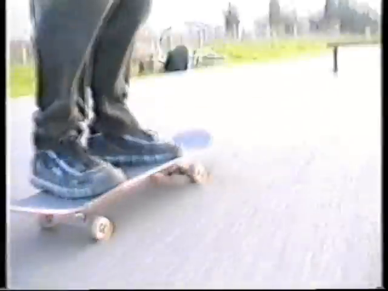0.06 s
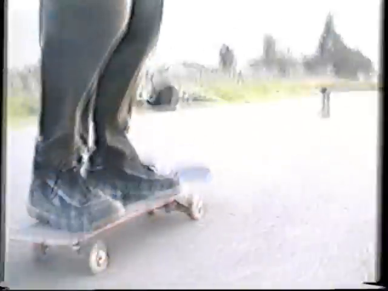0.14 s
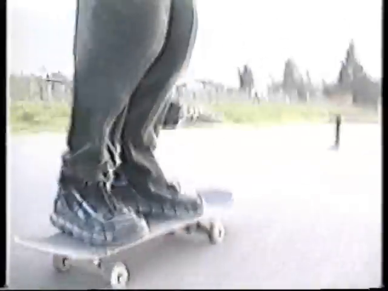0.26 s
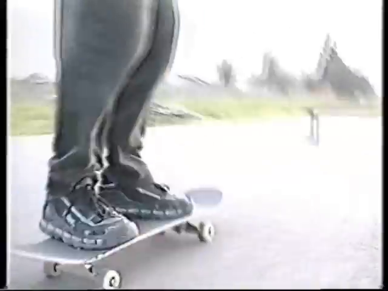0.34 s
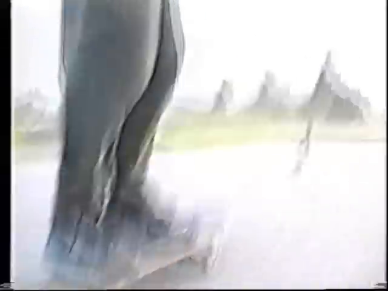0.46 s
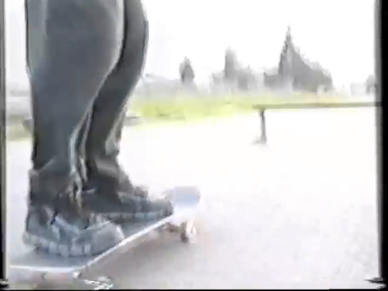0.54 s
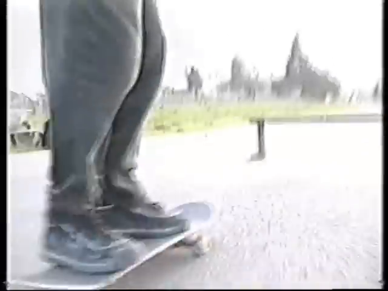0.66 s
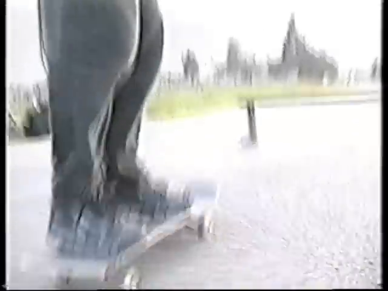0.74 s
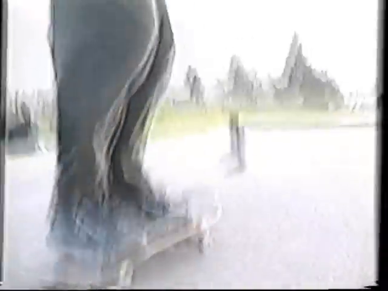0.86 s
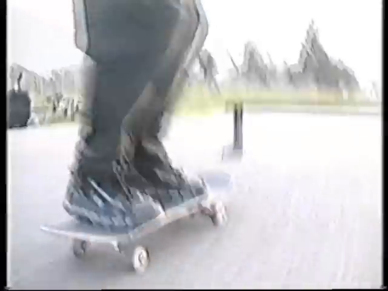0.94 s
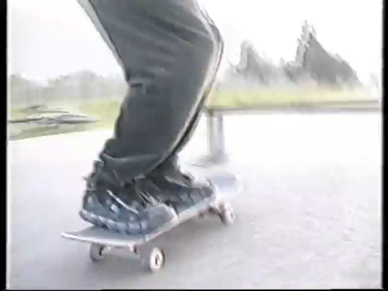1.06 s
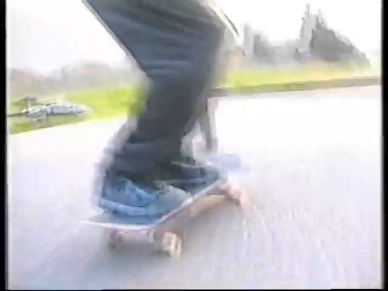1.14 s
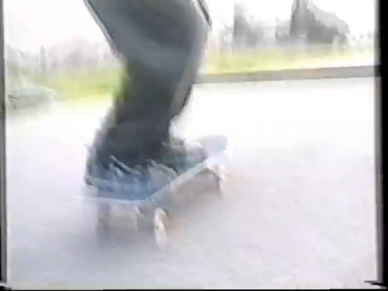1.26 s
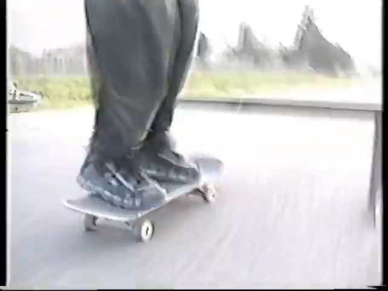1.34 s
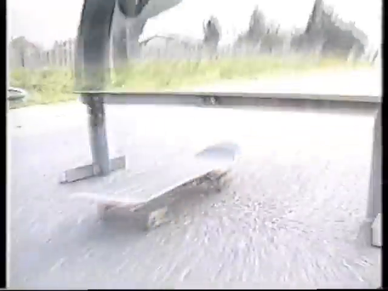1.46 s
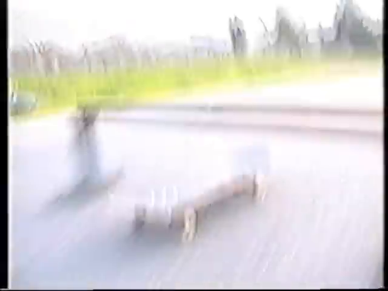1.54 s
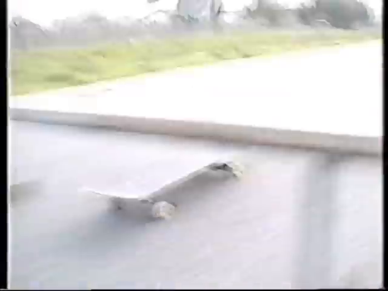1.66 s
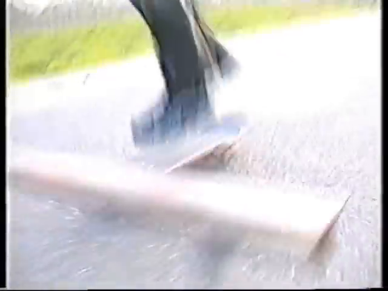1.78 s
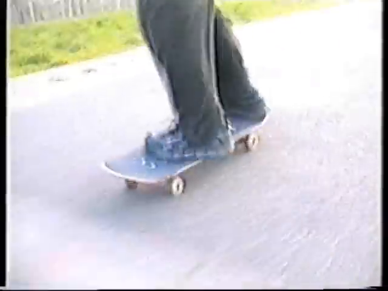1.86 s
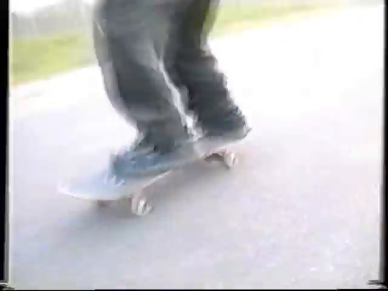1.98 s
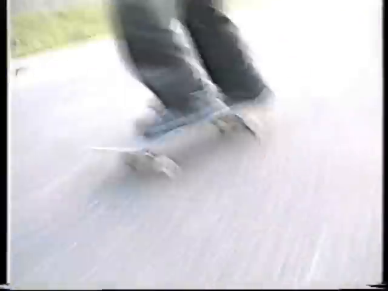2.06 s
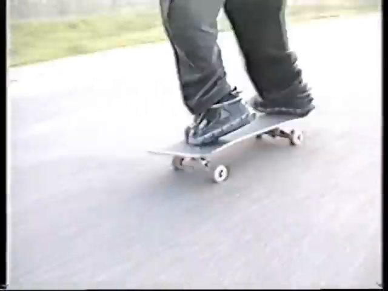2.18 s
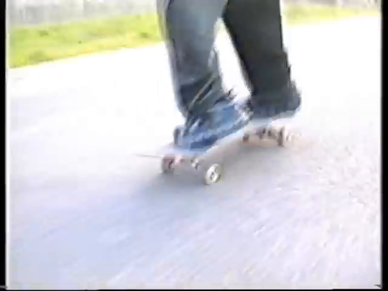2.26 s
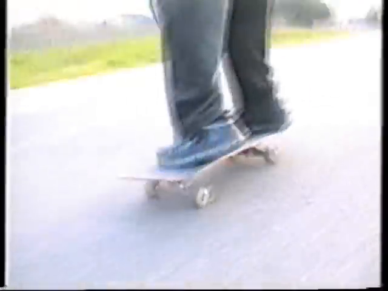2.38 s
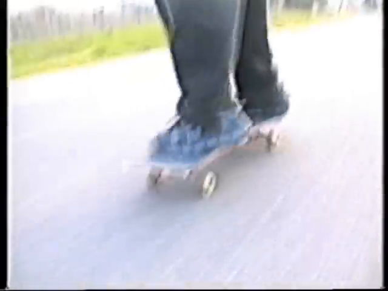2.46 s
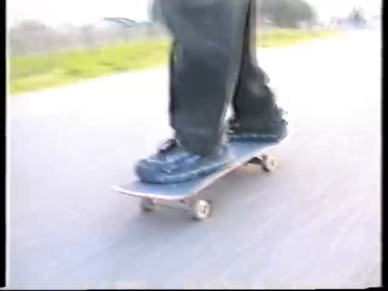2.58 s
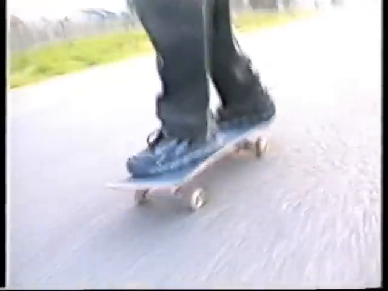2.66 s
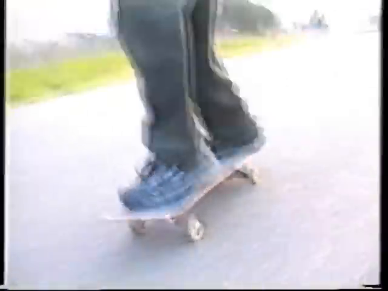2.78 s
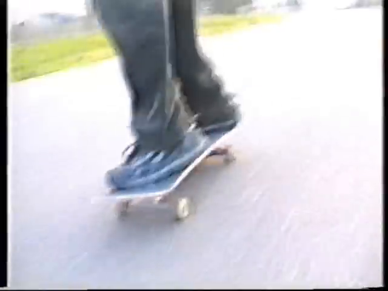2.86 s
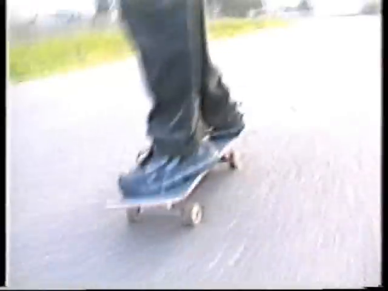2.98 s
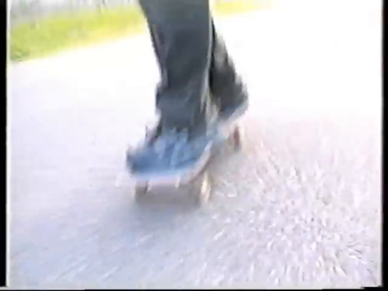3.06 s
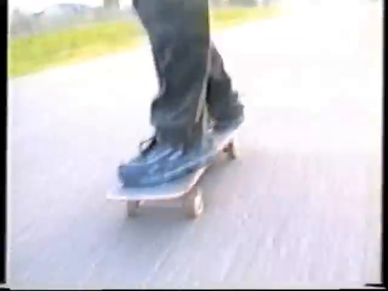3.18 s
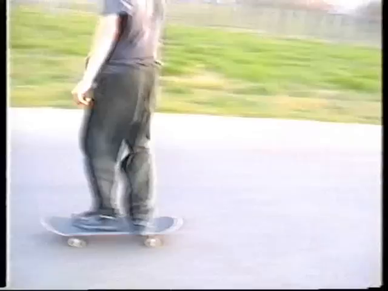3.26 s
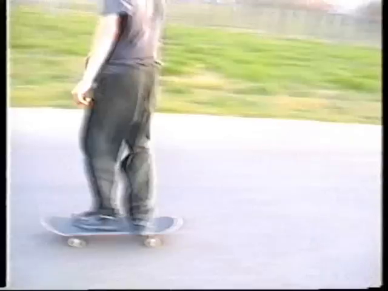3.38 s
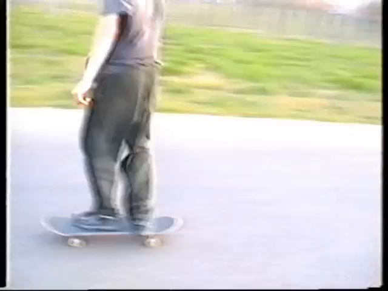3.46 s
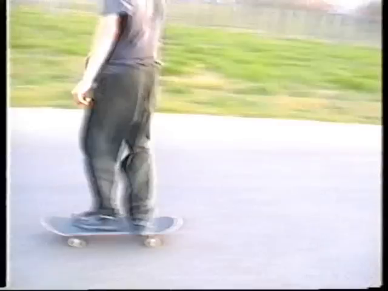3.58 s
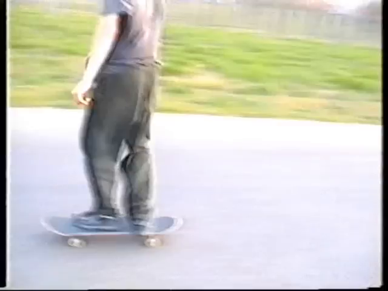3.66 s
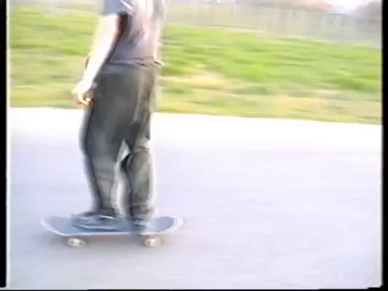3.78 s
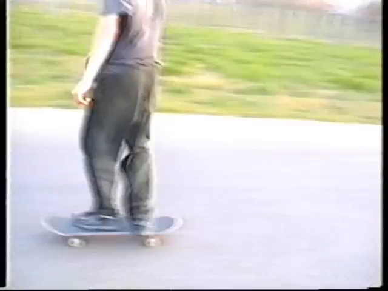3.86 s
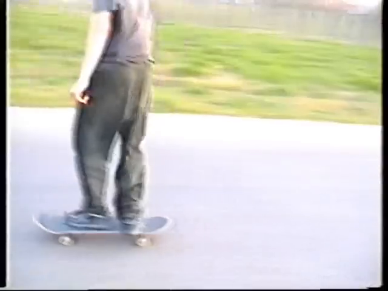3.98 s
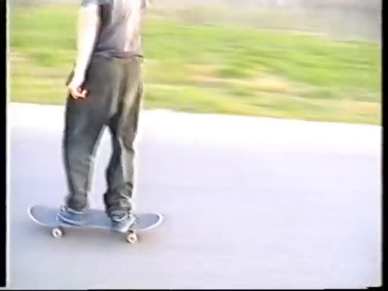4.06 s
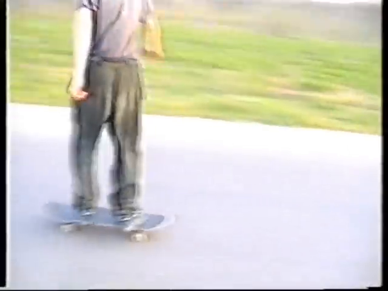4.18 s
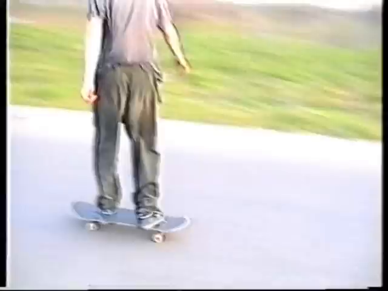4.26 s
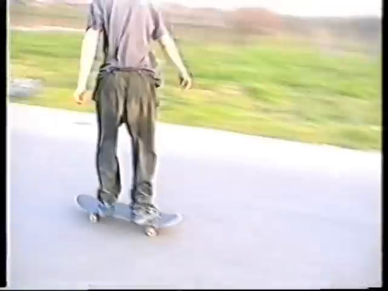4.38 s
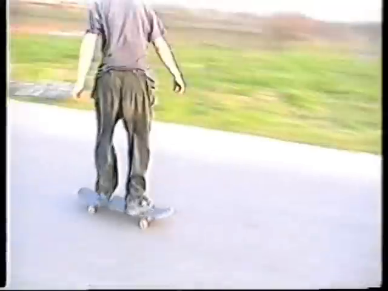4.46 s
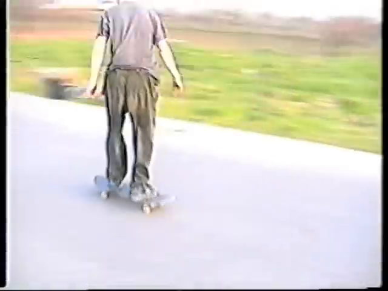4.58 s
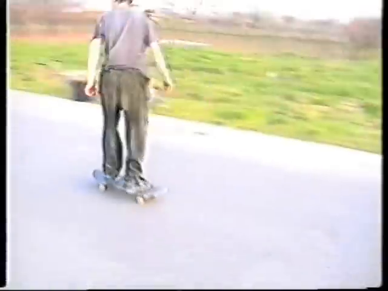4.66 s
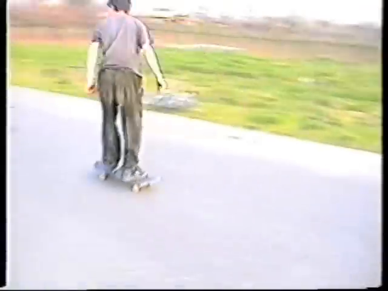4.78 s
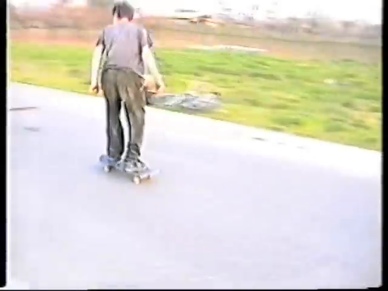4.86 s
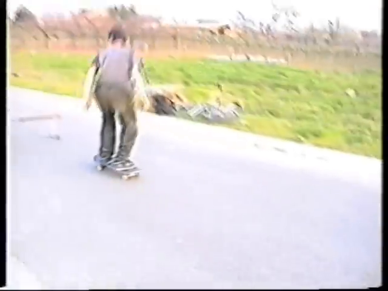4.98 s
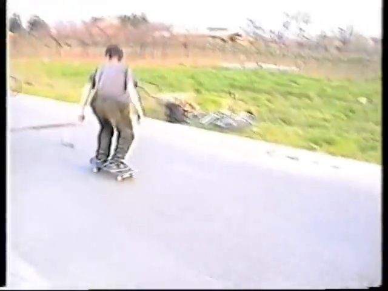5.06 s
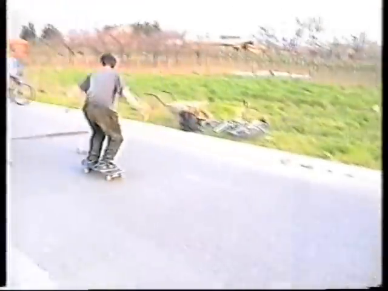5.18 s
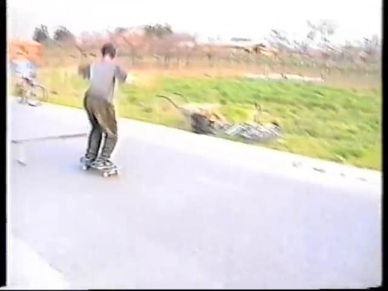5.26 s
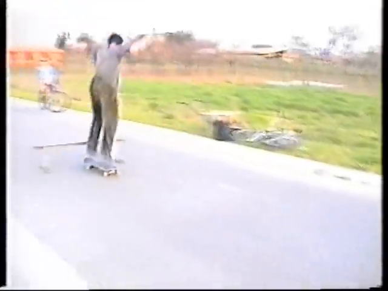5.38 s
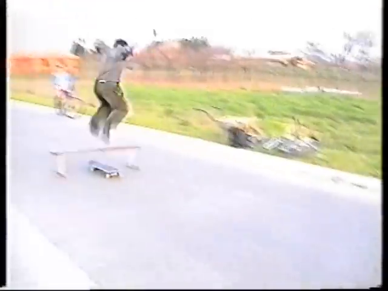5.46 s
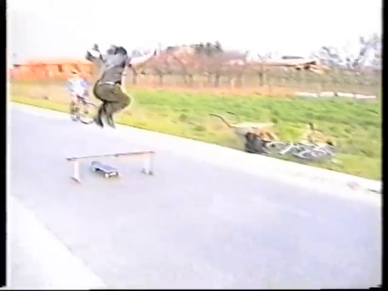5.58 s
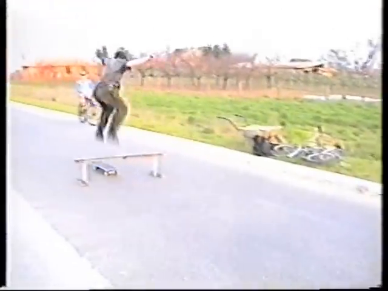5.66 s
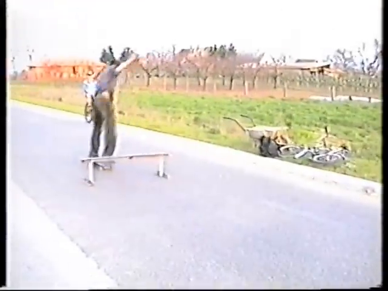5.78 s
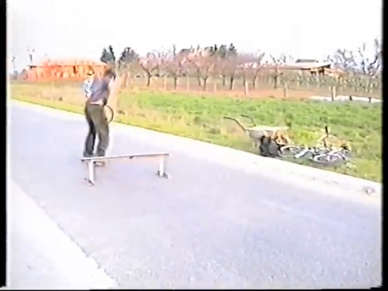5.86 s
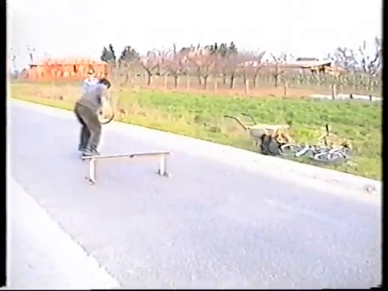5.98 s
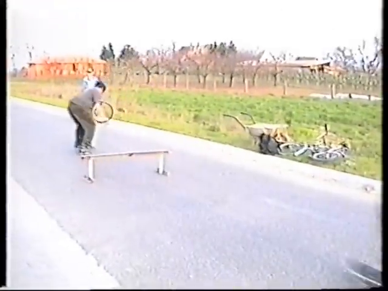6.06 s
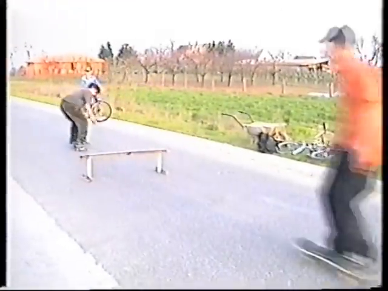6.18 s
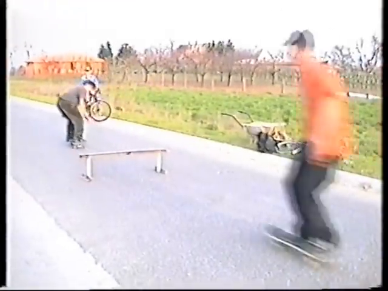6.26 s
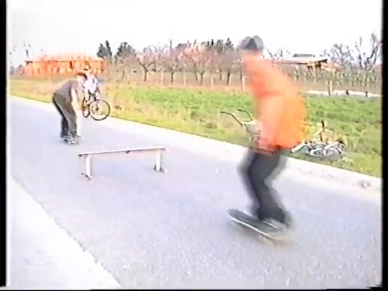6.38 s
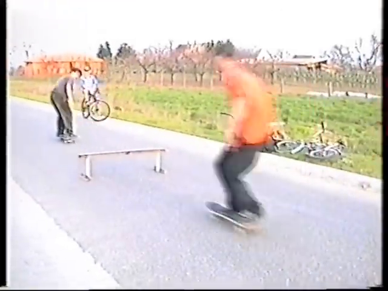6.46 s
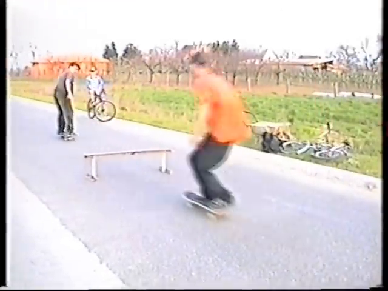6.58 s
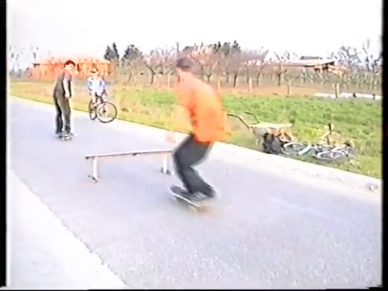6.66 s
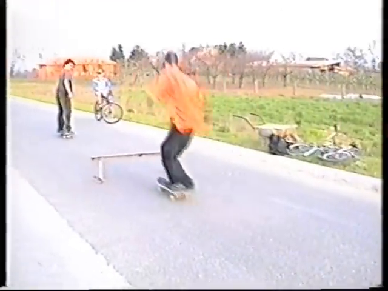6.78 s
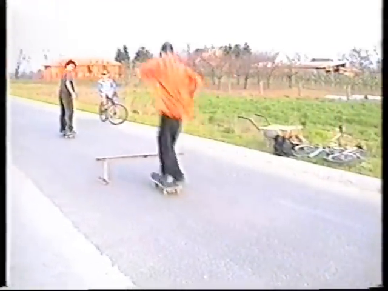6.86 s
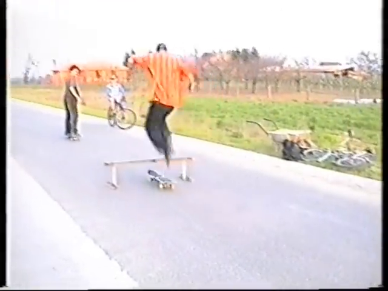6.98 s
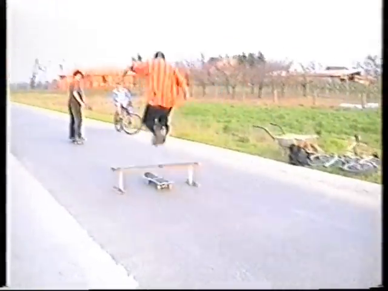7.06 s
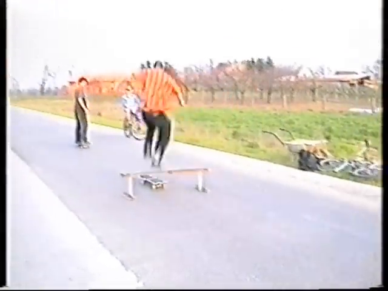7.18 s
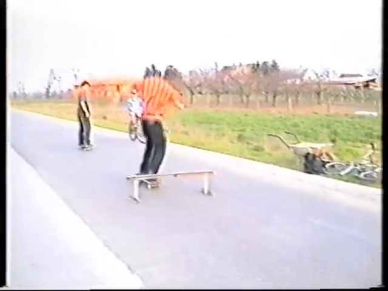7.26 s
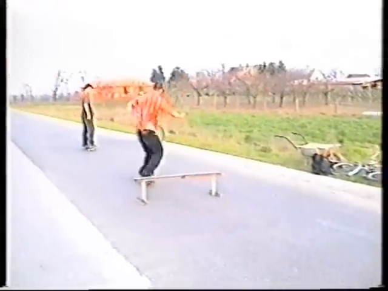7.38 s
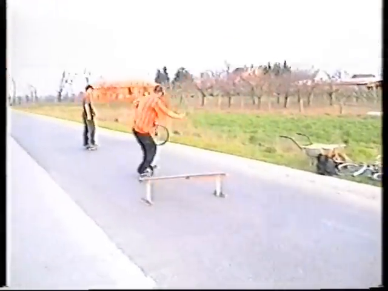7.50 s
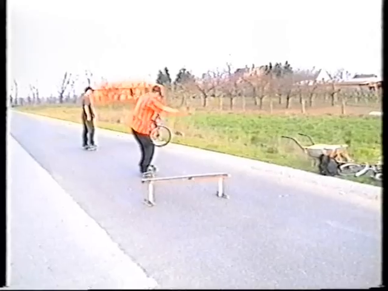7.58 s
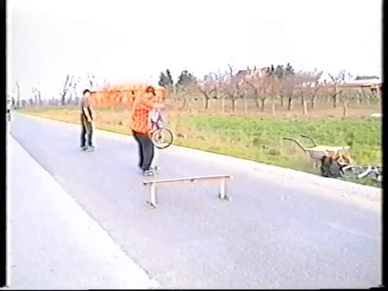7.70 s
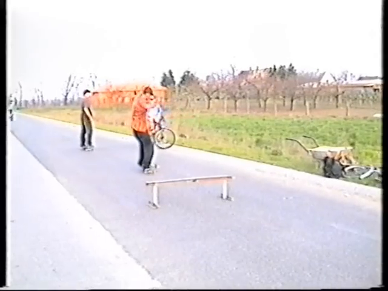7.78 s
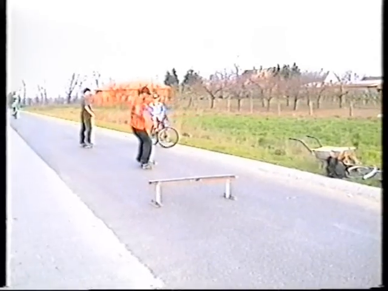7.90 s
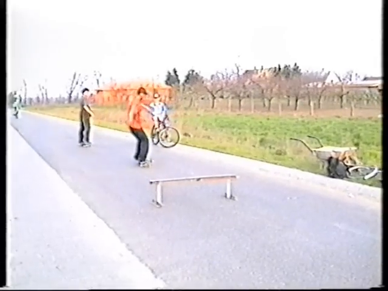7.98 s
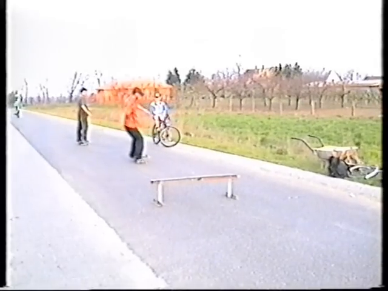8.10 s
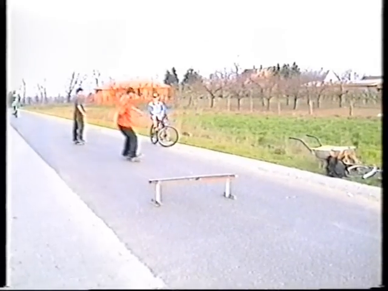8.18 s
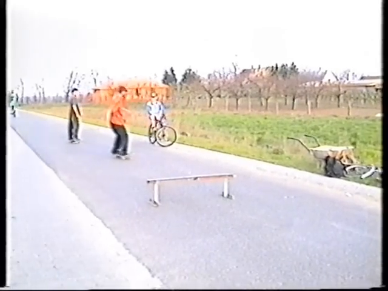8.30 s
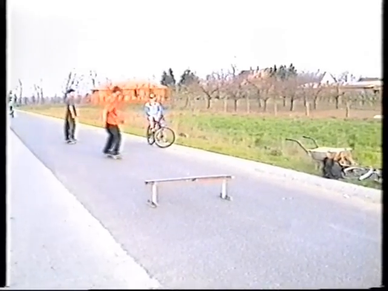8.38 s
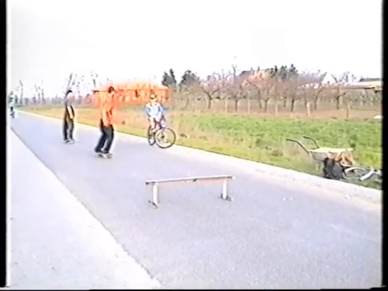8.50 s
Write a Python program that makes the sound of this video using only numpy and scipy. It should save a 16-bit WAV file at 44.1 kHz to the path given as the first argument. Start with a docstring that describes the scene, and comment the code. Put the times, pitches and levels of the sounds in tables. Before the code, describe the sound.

Skateboards roll steadily along a gritty road, their wheels chattering in turns and their decks clacking through two jumps and landings.

```python
"""Skateboards roll over rough asphalt that drums through wheels and deck; an old camera follows, hissing.
Stones click, and the wheels scuff and chatter in a hard turn. At 1.4 s a rider hops over a rail while
the empty board rattles on underneath, then he lands on it with a thud. At 3.3 s the camera stops for
an instant, and two more chattering turns follow. Near 7 s comes a second hop and landing, and the
board rolls on."""
import sys
import numpy as np
from scipy import signal
from scipy.fft import rfft, irfft, next_fast_len
from scipy.io import wavfile
from scipy.ndimage import uniform_filter1d

SR = 44100
rng = np.random.default_rng(int(sys.argv[2]) if len(sys.argv) > 2 else 0)


def materialize(psi):
    """Save the field psi as 16-bit PCM at rate SR to the path in sys.argv[1].

    A 1-D psi becomes a single channel; in a 2-D psi each row is a channel.
    """
    bounded = np.clip(np.atleast_2d(psi).T, -1, 1)
    quanta = np.round(bounded * 32767).astype(np.int16)
    wavfile.write(sys.argv[1], SR, quanta)


N = 376173
TIME = np.arange(N) / SR


def amp(db):
    """Turns decibels into a number to multiply by."""
    return 10 ** (np.asarray(db) / 20)


def evened(x):
    """Scales a sound to an average (rms) level of 1."""
    return x / np.sqrt(np.mean(x ** 2) + 1e-20)


def steady(x, span_s=0.092):
    """Holds the slow level at 1 and keeps the quick flutter."""
    power = uniform_filter1d(x ** 2, max(int(span_s * SR), 9))
    return x / np.sqrt(abs(power) + 1e-12)


def tone_curve(points, hz):
    """Joins (pitch_hz, level_db) points into a gain for every pitch."""
    pitch_hz, level_db = np.transpose(points)
    return amp(np.interp(np.log(hz + 1), np.log(pitch_hz + 1), level_db))


def shaped(x, points):
    """Filters a sound by a tone curve and sets its level to 1."""
    size = next_fast_len(len(x))
    gain = tone_curve(points, np.fft.rfftfreq(size, 1 / SR))
    return evened(irfft(rfft(x, size) * gain, size)[:len(x)])


def add(mix, start_s, sound):
    """Mixes a sound in at its start time."""
    part = mix[max(round(start_s * SR), 0):][:len(sound)]
    part += sound[:len(part)]


def wander(t, per_s):
    """A random curve of level 1 that changes course per_s times a second."""
    knots = np.arange(t[0], t[-1] + 2 / per_s, 1 / per_s)
    return evened(np.interp(t, knots, rng.standard_normal(len(knots))))


def bumps(events):
    """Adds up one bell-shaped rise for each (middle_s, half_width_s, height)."""
    return sum(height * np.exp(-((TIME - s) / width) ** 2) for s, width, height in events)


def road(stones_per_s=420, spread_db=3.5, board_share=0.16, grit_share=0.36, patch_db=0.9):
    """Fine grain and single stones, in rough and smooth patches, shake the board and crunch under it."""
    grain = rng.standard_normal(N)
    sizes = amp(spread_db * np.minimum(rng.exponential(1, N), 4)) * rng.choice([-1, 1], N)
    stones = evened(sizes * (rng.random(N) < stones_per_s / SR))
    patches = amp(patch_db * wander(TIME, per_s=75))
    # soft tyres swallow part of each stone, so the board gets a smaller share
    return [(np.sqrt(1 - share) * grain + np.sqrt(share) * stones) * patches
            for share in (board_share, grit_share)]


# The rider's weight comes onto the deck (the wooden plank): start_s, depth_db, bob_s, settle_s
LANDINGS = [(1.901, 6, 0.43, 0.42), (3.385, 9, 0.44, 0.13), (7.351, 0.5, 0.3, .4)]


def rider_weight(lag_s=0.066):
    """Load on the deck in dB: light at touchdown, heavy as the knees bend, then settling."""
    load = np.zeros(N)
    for start_s, depth_db, bob_s, settle_s in LANDINGS:
        since = np.maximum(TIME - start_s - lag_s, 0)
        bob = np.exp(-since / settle_s) * np.cos(2 * np.pi * since / bob_s)
        load -= (TIME > start_s) * depth_db * bob
    return load


# Wheels and grit swell briefly as a board comes near or is pressed down: middle_s, half_width_s, boost_db
SURGES = [(.06, 0.069, 3.5), (2.65, 0.17, 2.5), (2.96, 0.043, 2.5), (3.9, 0.086, 2), (4.01, 0.079, 4),
          (4.4, 0.087, 2.5), (5.58, 0.1, 2), (6.06, 0.069, 3.5), (7.53, 0.038, 1)]
# The rider eases his weight, so the deck hums less and the wheels chatter: middle_s, half_width_s, dip_db
EASINGS = [(.92, 0.13, 4.5), (1.27, 0.077, 3), (3.55, 0.13, 2), (4.97, 0.093, 4.5), (6.43, 0.044, 4)]
# The wheels skip off the road and the grit drops out: middle_s, half_width_s, dip_db
SKIPS = [(1.46, 0.013, 12), (7.057, 0.01, 24), (7.21, 0.0096, 14), (7.31, 0.029, 4)]


def riding_swells(sway_db=0.5):
    """How weight, nearness and skips raise and lower the deck, the wheels and the grit, in dB."""
    load, eased = rider_weight(), bumps(EASINGS)
    surge = sum(db / (1 + ((TIME - s) / width) ** 2) for s, width, db in SURGES)
    deck = load - eased
    wheels = load + surge + 0.92 * eased
    grit = 0.45 * load + surge + 0.44 * eased - bumps(SKIPS)
    return [swell + sway_db * wander(TIME, per_s=14) for swell in (deck, wheels, grit)]


# The rider leans and shifts his weight: middle_s, half_width_s, deck_pitch_share, wheel_pitch_share
LEANS = [(1.32, 0.1, -0.25, -0.046), (3.88, 0.045, -0.01, 0.025), (4.42, 0.12, 0.046, 0.029),
         (4.62, 0.054, -0.02, -0.033), (4.925, 0.042, -0.069, 0.2), (5.005, 0.038, -0.11, -0.06),
         (5.099, 0.044, .04, 0.099), (5.5, 0.062, -0.23, 0), (5.65, 0.097, 0.27, 0.12),
         (5.9, 0.13, .15, 0.05), (6.06, 0.093, -0.03, .12), (6.76, 0.051, -0.21, -0.0082)]


def leaning():
    """Leaning bends the hum of deck and wheels; gives a number to multiply each pitch by."""
    deck_bend = 1 + bumps([(s, width, deck) for s, width, deck, _ in LEANS])
    wheel_bend = 1 + bumps([(s, width, wheel) for s, width, _, wheel in LEANS])
    return deck_bend, wheel_bend


def hum(force, pitch_hz, width_hz):
    """A shaken part rings around its own pitch, which may glide."""
    turn = np.exp(2j * np.pi * np.cumsum(pitch_hz) / SR)
    decay = np.exp(-np.pi * width_hz / SR)
    return 2 * (turn * signal.lfilter([1 - decay], [1, -decay], force / turn)).real


# Tone of the rolling noise for each load and view of the board: pitch_hz, level_db
CLOSE = [(35, -62), (60, -35), (92, -26), (140, -10.5), (215, -9), (321, -6), (374, -5.5), (463, -4),
         (680, -16.5), (857, -14), (1330, -23), (1620, -21.5), (2780, -32), (3710, -44.5), (6000, -55),
         (7800, -92), (13200, -120)]
EMPTY = [(35, -44.5), (60, -16), (214, -2.5), (259, 1), (908, -9), (1000, -6), (1390, -11.5), (1750, -5.5),
         (2330, -15), (2720, -12.5), (3120, -21), (6000, -38), (7800, -69), (13200, -120)]
LANDED = [(35, -59), (60, -40), (118, -9), (297, -3), (396, -8.5), (463, -4.5), (667, -4.5), (763, -15),
          (908, -11), (1170, -23.5), (1890, -25.5), (4670, -47.5), (6000, -60), (7800, -86), (13200, -120)]
BEHIND = [(21, -77), (35, -53), (145, -4), (288, -2.5), (407, -5), (453, -6.5), (744, -15), (884, -15.5),
          (1190, -21), (1580, -21.5), (3900, -44.5), (4740, -55), (6000, -59), (7800, -95), (13200, -120)]
ALONGSIDE = [(21, -76), (35, -49), (76, -55), (110, -18), (248, -5), (374, -6.5), (484, -8.5), (654, -4),
             (846, -6), (1030, -17), (1480, -20), (2330, -24.5), (3740, -41), (4630, -44), (6000, -53),
             (7800, -87), (13200, -120)]
SIDE_ON = [(35, -66), (60, -37), (80, -37), (105, -21), (140, -11), (297, -5), (374, -4.5), (505, -9.5),
           (620, -4), (780, -5), (1060, -14), (1470, -22.5), (1750, -20.5), (2250, -25.5), (4670, -44),
           (6000, -52.5), (7800, -72), (13200, -120)]
CROUCHED = [(21, -69), (35, -43), (70, -49), (95, -35), (130, -11), (282, -5.5), (321, -4), (350, -5.5),
            (846, -5), (1420, -28), (2280, -34.5), (2650, -41), (3360, -37.5), (6000, -66), (7800, -96),
            (13200, -120)]
TWO_BOARDS = [(35, -73), (60, -33), (92, -30), (140, -15.5), (210, -9.5), (259, -4), (374, -2.5),
              (440, -3.5), (505, -11.5), (630, -9), (857, -7), (981, -16.5), (2620, -36), (3300, -38),
              (6000, -58.5), (7800, -70), (13200, -120)]
FAR = [(35, -64), (60, -34), (80, -29), (132, -11), (227, -1.5), (360, -3), (445, -8.5), (642, -8),
       (981, -12.5), (1210, -15.5), (2780, -34), (4000, -37.5), (6000, -57.5), (7800, -52), (13200, -120)]
# Tone of grit sizzling under the wheels: pitch_hz, level_db
SIZZLE = [(2500, -11), (5000, -6), (5900, -2), (7000, 3.5), (8400, 3), (9600, 2), (12500, -5), (14200, -4),
          (15500, -27)]
# Stretches of the ride, each with its own stance and view: start_s, tone, rumble_db, howl_db, grit_db,
# drift_db_per_s, deck_pitch_hz, wheel_pitch_hz, deck_hum_db, wheel_hum_db
RIDE = [(-.1, CLOSE, -22.5, -27.5, -41, -1, 397, 846, 1, -7),
        (1.431, EMPTY, -41, -40.5, -45.5, -3.5, 275, 724, -1, -8),
        (1.905, LANDED, -26.5, -27.5, -42, -1, 312, 634, 1.5, -6),
        (2.708, BEHIND, -24.5, -29.5, -43, 0.5, 302, 904, -0.5, -2),
        (3.375, ALONGSIDE, -24, -24, -38, -1.2, 305, 754, 0.5, -3.5),
        (3.94, SIDE_ON, -26.5, -26, -41.5, 5, 307, 664, -11, 6),
        (4.2, SIDE_ON, -24.5, -26, -40.5, -0.5, 378, 682, 4.5, 2),
        (5.11, CROUCHED, -23.2, -31.5, -37.5, -1.5, 334, 690, 1, -2.5),
        (5.43, TWO_BOARDS, -23.5, -28.5, -39, -0.5, 384, 740, 2, -22),
        (6.17, TWO_BOARDS, -24.5, -29, -39.5, 1, 356, 672, -2.5, 3.5),
        (6.93, FAR, -31, -34.5, -38, -2.5, 290, 690, -9, 3),
        (7.368, FAR, -27.5, -32.5, -39, -0.5, 356, 720, 0, -7)]


def rolling(shake, crunch, deck_top_hz=520, wheel_top_hz=1100, fade_s=0.0098, slowing_per_s=0.06):
    """The road makes the deck rumble (low), the wheels howl (middle) and the grit crunch (high)."""
    out, swells = np.zeros(N), riding_swells()
    deck_bend, wheel_bend = leaning()
    ends = [row[0] for row in RIDE[1:]] + [np.inf]
    for stretch, end in zip(RIDE, ends):
        start, tone, *levels, drift, deck_hz, wheel_hz, deck_hum_db, wheel_hum_db = stretch
        inside = (TIME > start - fade_s) & (TIME < end + fade_s)
        t = TIME[inside]
        # both hums waver, and sink as the board slows
        speed = 1 - slowing_per_s * (t - start) + 0.013 * wander(t, per_s=9.5)
        deck_hum = hum(shake[inside], deck_hz * speed * deck_bend[inside], width_hz=38)
        wheel_hum = hum(shake[inside], wheel_hz * speed * wheel_bend[inside], width_hz=48)
        drone = shake[inside] + amp(deck_hum_db) * deck_hum + amp(wheel_hum_db) * wheel_hum
        # split into low, middle and high, each with its own loudness
        size = next_fast_len(len(t))
        hz = np.fft.rfftfreq(size, 1 / SR)
        board = tone_curve(tone, hz)
        below_deck, below_wheel = (1 / (1 + (hz / top) ** 10) for top in (deck_top_hz, wheel_top_hz))
        bands = (drone, below_deck), (drone, below_wheel - below_deck), (crunch[inside], 1 - below_wheel)
        deck, wheels, grit = (steady(irfft(rfft(force, size) * board * band, size)[:len(t)])
                              for force, band in bands)
        deck_gain, wheel_gain, grit_gain = (amp(db + drift * (t - start) + swell[inside])
                                            for db, swell in zip(levels, swells))
        rumble = amp(0.45) * deck_gain * deck
        howl = amp(-1.35) * wheel_gain * wheels
        contact = amp(-0.22) * grit + amp(-22) * shaped(crunch[inside], SIZZLE)
        fade = np.clip(0.5 + 0.5 * np.minimum(t - start, end - t) / fade_s, 0, 1)
        out[inside] += fade * (rumble + howl + grit_gain * contact)
    return out


# Tone of the camera's hiss: pitch_hz, level_db
HISS = [(20, 19), (60, 32), (200, -27), (2000, 18), (6000, -9), (12000, 1.5), (15500, -5)]
# Thin notes from the camera's electronics: pitch_hz, level_db
WHINE = [(7198, -87), (8398, -82), (9598, -83), (10198, -84), (10798, -82), (11397, -83), (11997, -85)]


def camera_noise(hiss_db=-59, whine_gain_db=-1, waver_hz=3.4):
    """The camera's electronics hiss steadily and whine with a slight waver."""
    whine = np.zeros(N)
    for pitch_hz, level_db in WHINE:
        cycles = np.cumsum(pitch_hz + waver_hz * wander(TIME, per_s=25)) / SR
        whine += amp(level_db) * np.sqrt(2) * np.sin(2 * np.pi * cycles)
    return amp(hiss_db) * shaped(rng.standard_normal(N), HISS) + amp(whine_gain_db) * whine


# Tone of the crack that starts a knock or a clack: pitch_hz, level_db
CRACK = [(150, -3), (500, 7.5), (1000, 6), (1900, 1.5), (2700, -0.5), (3700, 1.5), (5000, -18), (8000, -12),
         (11000, -19), (15000, -29)]


def crack(t, fade_s, span_s):
    """Two hard things meet in a burst of noise that falls by 60 dB in fade_s."""
    return steady(shaped(rng.standard_normal(len(t)), CRACK), span_s) * amp(-60 * t / fade_s)


def ring(notes, t, detune=0.17, uneven_db=4):
    """A struck part's notes die away; each blow lands elsewhere, so they vary a little."""
    strength, shift, phase = rng.random((3, len(notes), 1)) - 0.5
    pitch_hz, level_db, fade_s = np.transpose(notes)[:, :, None]
    loudness = amp(level_db + uneven_db * strength - 60 * t / fade_s)
    cycles = pitch_hz * (1 + detune * shift) * t + phase
    return (loudness * np.sin(2 * np.pi * cycles)).sum(0)


# Notes of the wooden deck and of the trucks (the metal wheel mounts): pitch_hz, level_db, fade_s
DECK_NOTES = [(455, 0, 0.033), (849, 2, 0.056), (982, -2, 0.084), (1425, -1.5, 0.026), (1650, -3, 0.022),
              (1980, -4, 0.026)]
TRUCK_NOTES = [(1670, 0, 0.056), (2130, -2, 0.033), (2695, -5.5, 0.028), (3300, -2, 0.013),
               (3780, -8, 0.012)]
# Knocks from stones, trucks and shoes: start_s, level_db, hardness_db, crack_fade_s, dull_above_hz
# Hardness above 0 means more metal, below 0 more wood.
KNOCKS = [(0.7365, -18, -8, 0.01, 1130), (0.759, -22.5, -6, 0.015, 1600), (1.1744, -23, -6, 0.027, 3000),
          (1.253, -31, -3, .025, 2200), (1.416, -18.5, 1, 0.051, 2200), (1.4324, -20.5, -6, 0.023, 4000),
          (1.4815, -23, 11, 0.033, 6000), (1.502, -19, 3, 0.058, 3300), (1.524, -22.5, 6, 0.018, 6000),
          (1.571, -33, 3, .025, 3000), (1.6307, -27, -2, 0.027, 4500), (1.702, -29, -3, .03, 2300),
          (1.806, -29, -1, .03, 2000), (1.8835, -15, 2, 0.025, 6000), (1.8905, -22, -13, 0.019, 1200),
          (1.916, -18.5, 0, 0.016, 4600), (2.2734, -28, 9.5, .034, 5000), (2.394, -25.5, -10, 0.02, 1943),
          (2.443, -31, -4, 0.017, 2480), (2.5095, -20.5, -8, 0.023, 2300), (2.6394, -22.5, 3, .034, 4500),
          (3.295, -24, -2, 0.024, 2600), (3.428, -21, 0, 0.055, 1600), (3.475, -18.5, 0, .04, 1910),
          (4.183, -22.5, -3, 0.028, 2300), (4.245, -25, -1, .03, 5500), (4.363, -22, 4, 0.034, 4200),
          (4.5451, -25, 6, 0.027, 4000), (5.8685, -22, -7, 0.047, 4500), (6.09, -22, -5, 0.034, 2400),
          (6.944, -20, -4, 0.035, 1500), (7.3764, -18.5, -1, 0.038, 1700), (7.385, -19, 5, 0.022, 2600),
          (7.4471, -21, -1, .035, 2200), (7.461, -33, -1, .03, 2200), (7.4925, -22.5, -2, .03, 1800),
          (7.733, -23, 0, 0.035, 2400), (7.762, -20.5, -2, .04, 1700), (7.8837, -27.5, 7, 0.023, 4470),
          (7.918, -30, 6, .04, 4500)]


def knocks(gain_db=-2, rise_s=0.00081, bright_hz=3500):
    """Each blow is a crack that rings deck and trucks; a softer contact dulls and damps it."""
    out, t = np.zeros(N), TIME[:8192]
    hz = np.fft.rfftfreq(len(t), 1 / SR)
    for start_s, level_db, hardness_db, crack_fade_s, dull_above_hz in KNOCKS:
        snap = crack(t, crack_fade_s, span_s=0.0047)
        wood = amp(-6 - hardness_db) * ring(DECK_NOTES, t)
        metal = amp(-7.5 + hardness_db) * ring(TRUCK_NOTES, t)
        damping = amp(-60 * t / (3.5 * crack_fade_s))
        blow = (snap + (wood + metal) * damping) * (1 - np.exp(-t / rise_s))
        treble_floor = amp(-10) * min(dull_above_hz / bright_hz, 1) ** 2
        dulling = np.maximum(1 / (1 + (hz / dull_above_hz) ** 8), treble_floor)
        add(out, start_s, amp(level_db + gain_db) * irfft(rfft(blow) * dulling)[:len(t) // 2])
    return out


# Wheels skid or hiss, soles slap, and the deck rumbles up under the rider's weight after a landing:
# start_s, length_s, pitch_hz, width_octaves, level_db
SCUFFS_AND_RUMBLES = [(1.503, .006, 1640, 0.25, -22), (2.03, .045, 3280, .2, -44),
                      (2.05, 0.13, 590, 0.31, -25.5), (2.064, 0.087, 283, 0.35, -23),
                      (2.048, .09, 1500, 0.53, -36.5), (.85, 0.16, 1560, 0.14, -37.5),
                      (1.018, 0.63, 1700, 0.32, -43), (4.048, 0.17, 1700, 0.47, -39.5),
                      (4.859, 0.15, 1340, 0.1, -36), (5.419, 0.77, 7900, .12, -59),
                      (5.433, 0.38, 1130, 0.28, -34.5), (5.899, 0.2, 1220, .35, -35.5),
                      (6.3, 0.82, 3720, 0.27, -56.5), (6.93, 0.13, 1910, 0.5, -42),
                      (7.075, 0.12, 1900, 0.81, -45.5), (7.385, 0.15, 1380, 0.29, -30.5),
                      (7.483, 0.12, 450, 0.52, -24), (7.5, .17, 1170, .35, -35),
                      (7.688, 0.11, 1290, 0.37, -33.5), (7.841, 0.13, 2600, 0.32, -43.5),
                      (7.95, 0.33, 1210, .15, -42), (8.437, 0.086, 1800, 0.56, -39)]


def scuffs_and_rumbles(flutter_db=4.5, flutters_per_s=240):
    """Short swells of fluttering noise: scuffs that stick and slip, and low rumbles after a landing."""
    out, t = np.zeros(N), TIME[:SR]
    hz = np.fft.rfftfreq(SR, 1 / SR)
    for start_s, length_s, pitch_hz, width_octaves, level_db in SCUFFS_AND_RUMBLES:
        band = np.exp(-0.5 * (np.log2((hz + 1) / pitch_hz) / width_octaves) ** 2)
        noise = irfft(rfft(rng.standard_normal(SR)) * band, SR)
        rough = evened(noise * amp(flutter_db * wander(t, flutters_per_s)))
        swell = np.sin(np.pi * np.minimum(t / length_s, 1))
        add(out, start_s, amp(level_db) * rough * swell)
    return out


# Notes of the loose axle parts: pitch_hz, level_db, fade_s
AXLE_NOTES = [(1725, -2, 0.014), (2230, -3.5, 0.018), (2720, -5.5, .016), (3050, -4.5, 0.018)]
# Wheels chatter sideways in a hard turn: start_s, level_db, pitch_hz
CLACKS = [(.866, -29, 1490), (.876, -20, 1520), (.887, -24.5, 1550), (0.898, -21, 1570), (.912, -19, 1600),
          (.922, -24, 1560), (.950, -19.5, 1540), (.972, -33, 1550), (0.992, -19, 1480), (3.508, -15, 1280),
          (3.527, -24, 1300), (3.5432, -15, 1280), (3.5644, -16, 1250), (3.581, -17, 1310),
          (3.598, -23, 1300), (3.6443, -20.5, 1235), (3.702, -25, 1250), (3.817, -26, 1250),
          (3.825, -28, 1250), (3.835, -29, 1180), (3.851, -26, 1270), (3.862, -31, 1250), (4.91, -22, 1280),
          (4.9338, -15.5, 1370), (4.945, -26, 1320), (4.964, -18, 1330), (4.974, -22, 1330)]


def wheel_clacks(gain_db=-4, rise_s=0.00059, wheel_fade_s=0.024, dull_above_hz=3500):
    """The wheels grip and let go in jerks; each jerk rings the wheel and the loose axle parts."""
    out, t = np.zeros(N), TIME[:4096]
    hz = np.fft.rfftfreq(len(t), 1 / SR)
    dulling = np.maximum(1 / (1 + (hz / dull_above_hz) ** 10), amp(-13))
    for start_s, level_db, pitch_hz in CLACKS:
        click = amp(-2) * crack(t, fade_s=0.02, span_s=0.004)
        ringing = ring(AXLE_NOTES + [(pitch_hz, 0, wheel_fade_s)], t, detune=0.076, uneven_db=1)
        jerk = (click + ringing) * (1 - np.exp(-t / rise_s))
        add(out, start_s, amp(level_db + gain_db) * irfft(rfft(jerk) * dulling))
    return out


# Heavy blows on the loaded deck: start_s, pitch_hz, level_db, fade_s
THUDS = [(1.5062, 530, -7, 0.017), (1.513, 497, -18, 0.035), (1.8873, 425, -12.5, 0.047),
         (1.8928, 368, -12, 0.031), (1.9163, 740, -12, .018), (3.429, 240, -16, 0.05),
         (7.407, 336, -10.5, 0.038)]


def deck_thuds(rise_s=0.0015, sag_per_s=9):
    """The deck flexes and rings briefly, its pitch sinking as the foot damps it."""
    out, t = np.zeros(N), TIME[:4096]
    for start_s, pitch_hz, level_db, fade_s in THUDS:
        cycles = np.cumsum(pitch_hz * np.exp(-sag_per_s * t)) / SR
        loudness = amp(level_db - 60 * t / fade_s) * (1 - np.exp(-t / rise_s))
        add(out, start_s, loudness * np.sin(2 * np.pi * cycles))
    return out


def scene():
    """Boards rolling in the open air."""
    shake, crunch = road()
    ride = rolling(shake, crunch) + knocks() + wheel_clacks() + deck_thuds() + scuffs_and_rumbles()
    return (ride + camera_noise())[None]


# Faint mirror images of the sound around 1, 2, 3 and 4 times the camera's clock rate: level_db
MIRRORS_DB = [-33, -39.5, -42.5, -43.5]
# The camera's short stop: start_s, end_s
PAUSE_S = (3.3455, 3.397)


def record(dry, peak_limit=0.36, clock_hz=3901, click_db=-16, top_hz=15750):
    """The camera rounds off peaks, mirrors the howl into the treble and stops once with a click."""
    rounded = dry / (1 + (dry / peak_limit) ** 8) ** (1 / 8)
    # coarse sampling makes the mirror images
    clock = sum(2 * amp(db) * np.cos(2 * np.pi * k * clock_hz * TIME)
                for k, db in enumerate(MIRRORS_DB, 1))
    highs = signal.lfilter(*signal.butter(1, 900, "high", fs=SR), rounded)
    running = (TIME < PAUSE_S[0]) | (TIME > PAUSE_S[1])
    out = (rounded + clock * highs) * running
    add(out[0], PAUSE_S[0], amp(click_db) * np.exp(-TIME[:64] / 0.0001))
    out = out + amp(-100) * shaped(rng.standard_normal(N), HISS)
    treble_cut = signal.firwin(511, top_hz, window=("kaiser", 9), fs=SR)
    return signal.oaconvolve(out, treble_cut[None], "same")


dry = scene()
out = record(dry)
materialize(out)
```